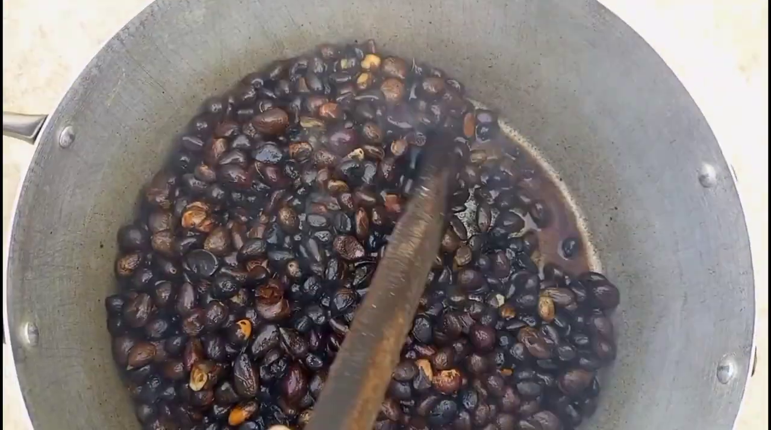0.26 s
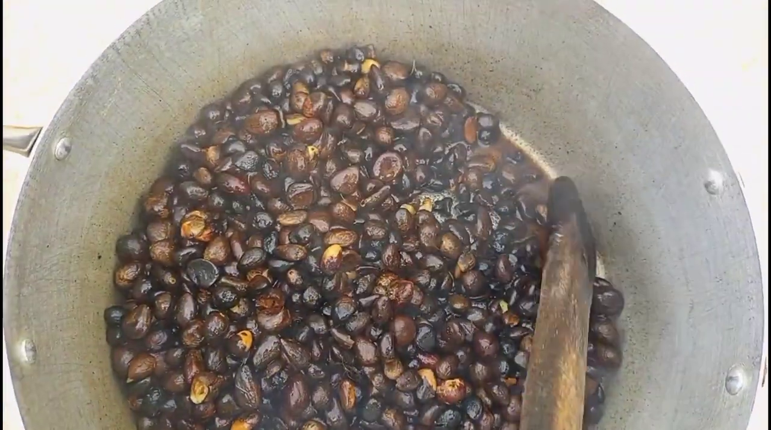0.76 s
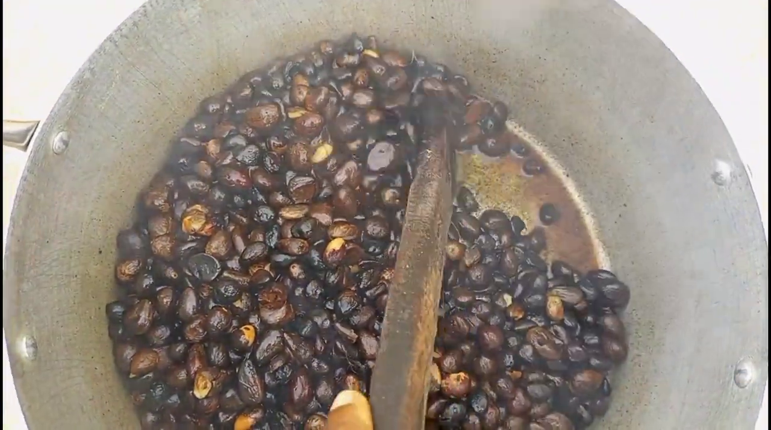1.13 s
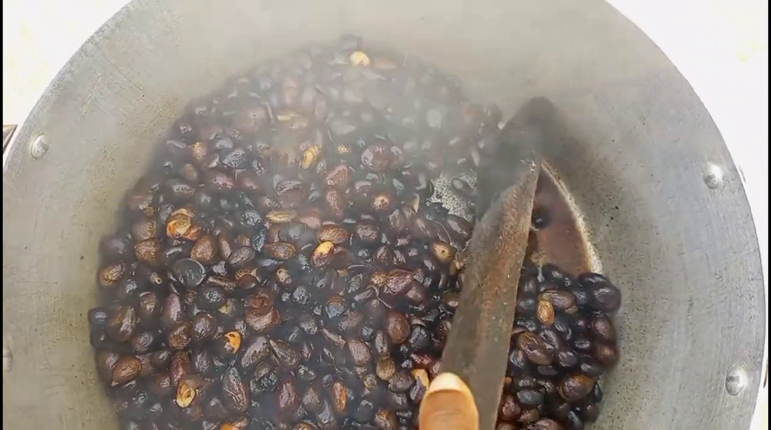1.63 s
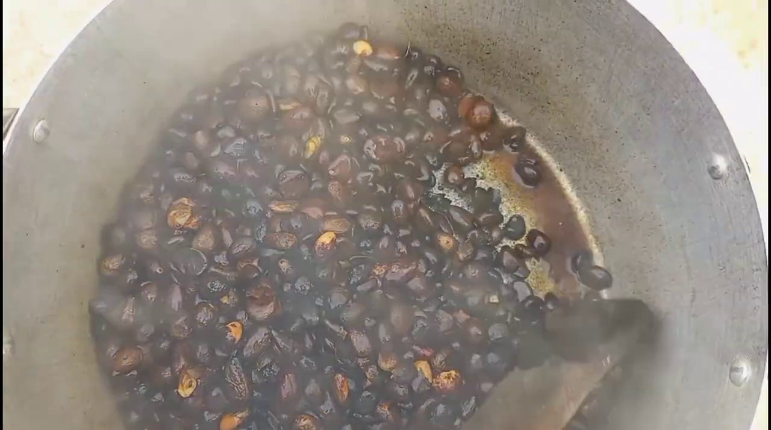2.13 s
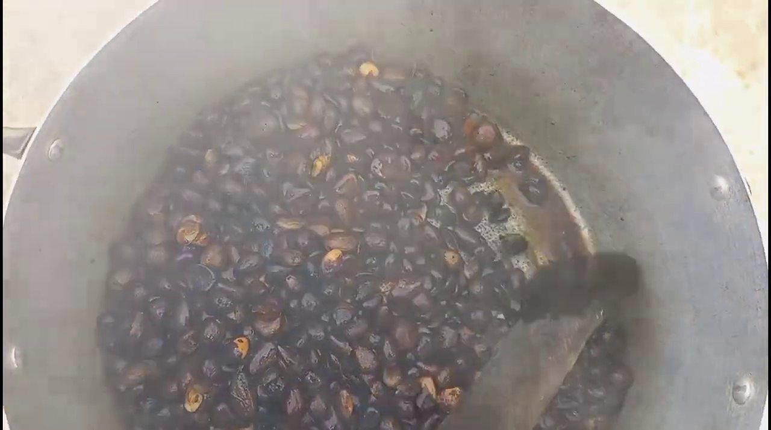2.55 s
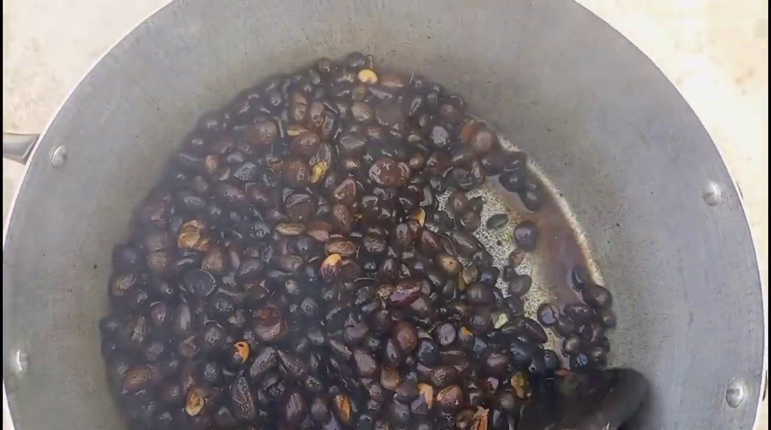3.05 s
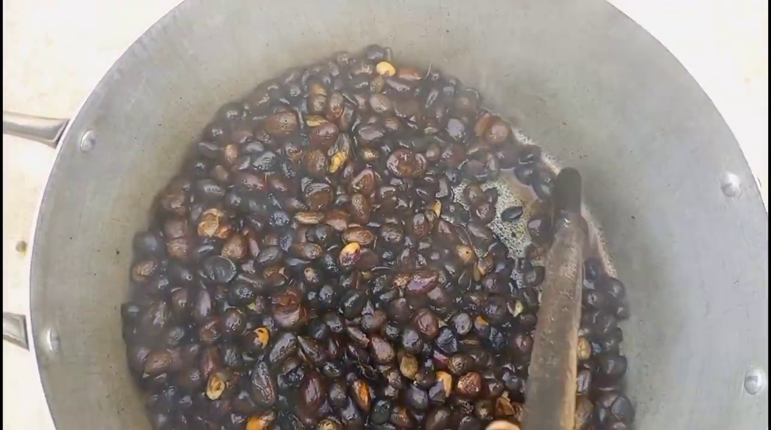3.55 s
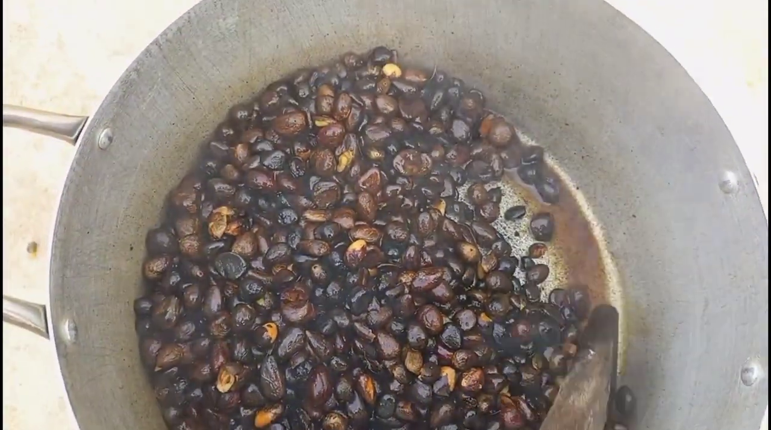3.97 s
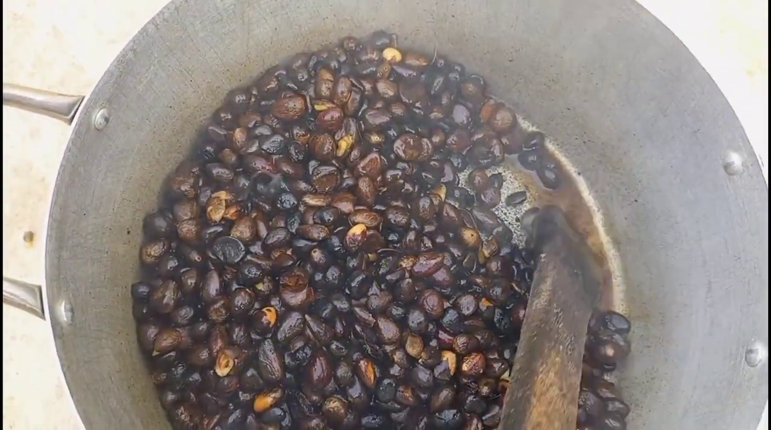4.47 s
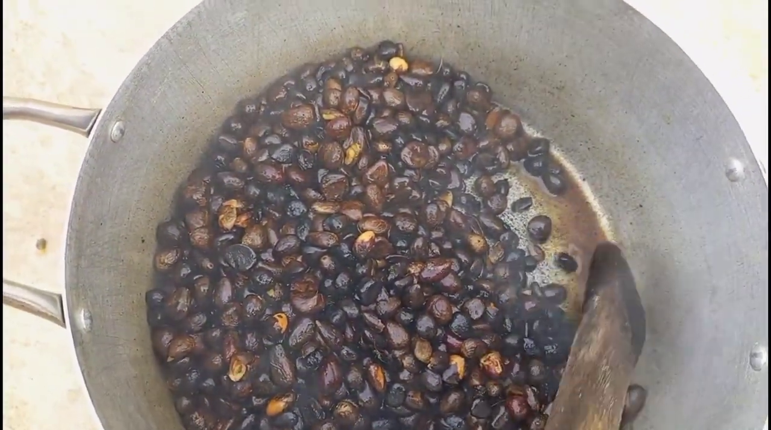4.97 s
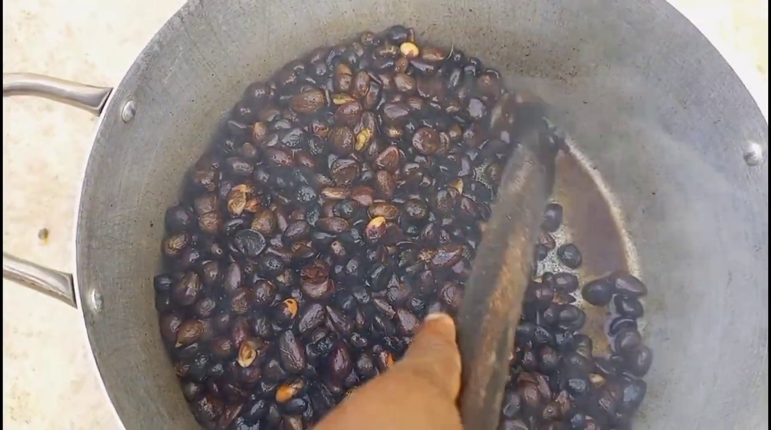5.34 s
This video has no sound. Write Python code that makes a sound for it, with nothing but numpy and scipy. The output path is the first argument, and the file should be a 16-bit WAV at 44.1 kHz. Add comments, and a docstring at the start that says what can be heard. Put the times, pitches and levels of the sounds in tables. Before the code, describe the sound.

Close, dry outdoor sound inside a metal pot. At 0 s there is only very faint fine sizzle, quiet air and a thin wavering whistle around 1.1 kHz, gone by 0.3 s. At 0.27 s quick dull knocks start a rattling shove and a brief sizzle flare; a weaker stroke follows at 0.5. A hard hollow knock at 1.0 brings rumble and clattering kernels, then a low pot shudder near 1.25 and a loud woody snap at 1.4. Dense clacks run 1.5-1.9, leading to a strong shove and sharp crack at 1.95. A heavy thud lands at 2.6, with kernels rattling and wall scrapes until 3. After a lull with small snaps, heavy knocks at 3.55 and 3.64 lead into bright scraping and clinks until 4.25. A knock at 4.48, soft rattling from 4.6 and a crisp snap at 4.95 follow; quiet, then a final rattling push at 5.5.

```python
"""A faint, fine sizzle opens the scene under a thin whistle that soon fades; loose kernels shift in a metal pot.
Hot shells snap now and then, as noise bursts with a woody body and a sharp top. A spatula shoves the heap of
kernels, which rumbles, rattles and settles: grains of short ringing kernels follow the level of each stroke.
The blade knocks, scrapes, groans and clinks on the pot, and hard kernels clack: struck modes, filtered clicks
and a sagging tone. The pot also shudders dully once; short echoes between its walls enclose most layers."""
import sys
import numpy as np
from scipy import signal
from scipy.fft import rfft, irfft, next_fast_len
from scipy.io import wavfile
from scipy.ndimage import uniform_filter1d

SR = 44100
rng = np.random.default_rng(int(sys.argv[2]) if len(sys.argv) > 2 else 0)


def dump_mix(stems):
    """Bounce the given channels to the path in sys.argv[1] as a 16-bit WAV at rate SR."""
    frames = np.atleast_2d(stems).T  # one column per channel
    limited = np.clip(frames, -1, 1)  # hard clip at full scale
    pcm = np.round(limited * 32767).astype(np.int16)
    wavfile.write(sys.argv[1], SR, pcm)


N = 246959
TIME = np.arange(N) / SR
HIT = np.arange(SR // 6) / SR   # the time axis of one short sound, in seconds


def from_db(db):
    """Decibels to gain."""
    return 10 ** (np.asarray(db) / 20)


def rms_one(x):
    """Scale to unit power."""
    return x / np.sqrt(np.mean(x ** 2) + 1e-20)


def peak_one(x):
    """Scale to unit height."""
    return x / (np.abs(x).max() + 1e-20)


def strike(x):
    """Scale a click to unit power over its first 6 ms."""
    return x / np.sqrt(np.mean(x[:round(.006 * SR)] ** 2) + 1e-20)


def in_time(rows):
    """The columns of a table, joined by straight lines."""
    s, *columns = np.transpose(rows)
    return [np.interp(TIME, s, c) for c in columns]


def drift(per_s):
    """Slow random wandering with a spread of about one, turning on average per_s times a second."""
    turns = np.cumsum(rng.exponential(1 / per_s, 1024))
    return np.interp(TIME, turns, rng.standard_normal(len(turns)))


def add(out, s, sound):
    """Mix a sound in at a time."""
    start = max(round(s * SR), 0)
    out[start:start + len(sound)] += sound[:max(N - start, 0)]


def band(x, low_hz, high_hz):
    """Butterworth band-pass."""
    return signal.sosfilt(signal.butter(2, [low_hz, high_hz], "band", fs=SR, output="sos"), x + 1e-18)


def dulled(x, edge_hz=7200):
    """Wet kernels and a blunt blade give little top."""
    return signal.sosfilt(signal.butter(4, edge_hz, fs=SR, output="sos"), x + 1e-18)


def resonance(x, hz, width_hz):
    """One ringing mode."""
    r = np.exp(-np.pi * width_hz / SR)
    return signal.lfilter([1, 0, -1], [1, -2 * r * np.cos(2 * np.pi * hz / SR), r * r], x + 1e-18)


def coloured(x, spectrum):
    """Causal (minimum-phase) filter with the given spectrum."""
    size = 2 * next_fast_len(len(x) // 2 + 2048)
    hz, db = np.transpose(spectrum)
    grid = np.log(np.arange(size // 2 + 1) * SR / size + 1)
    log_gain = np.log(from_db(np.interp(grid, np.log(hz), db)))
    # folding the cepstrum onto positive times makes the filter minimum-phase
    cepstrum = irfft(log_gain)
    cepstrum[1:size // 2] *= 2
    cepstrum[size // 2 + 1:] = 0
    return irfft(rfft(x, size) * np.exp(rfft(cepstrum)))[:len(x)]


def burst(t60):
    """A dying puff of noise."""
    return rng.standard_normal(len(HIT)) * from_db(-60 * HIT / t60)


def chime(hz, t60):
    """Modes struck together, each starting at a chance point of its cycle."""
    hz = np.reshape(hz, (-1, 1))
    return np.sin(2 * np.pi * (hz * HIT + rng.random(hz.shape))) * from_db(-60 * HIT / t60)


def contacts(per_s, spread_db):
    """Random touches, mostly light and a few hard."""
    return (rng.random(N) < per_s / SR) * from_db(spread_db * np.minimum(rng.exponential(1, N), 3))


def evened(sound, even_s):
    """The steady push of the hand evens out the power."""
    power = np.abs(uniform_filter1d(sound ** 2, int(even_s * SR) + 1))
    return sound / np.sqrt(power + 0.011 * power.mean())


def bowl(x, wet_db=-15, t60=0.08):
    """Sound bounces briefly between the metal walls: a short tail of coloured noise."""
    colour = [(100, -2.0), (1500, -6.5), (3300, -10), (7000, -2.0), (15000, -21.0)]
    echoes = coloured(burst(t60) * (1 - np.exp(-HIT / 0.0015)), colour)
    echoes /= np.sqrt(2 * np.sum(echoes ** 2))
    return x + from_db(wet_db) * signal.oaconvolve(x, echoes)[:N]


# Colour of the air bed. Each row: frequency in Hz, relative level in dB.
AIR_COLOUR = [(30, -25), (300, 1), (1000, -7.5), (1800, -3.5), (4400, -21), (16000, -24.5)]
# Colour of the bursting bubbles. Each row: frequency in Hz, relative level in dB.
FIZZ_COLOUR = [(900, -26), (2100, -1.5), (4500, -19), (6300, -5), (7800, -10.5), (9800, -4.5), (12000, -18),
               (15000, -13)]
# The sizzle flares as the first stroke turns wet kernels onto hot metal. Each row: time in seconds, level in dB.
FIZZ_LEVEL = [(.25, -71.5), (.29, -57), (.6, -67), (1.6, -68.5)]


def sizzle(air_db=-78, crackle_db=-76):
    """Countless tiny bubbles and a few larger ones burst in the hot liquid, over still outdoor air."""
    fizz = rms_one(coloured(rng.standard_normal(N), FIZZ_COLOUR))
    bubbles = signal.oaconvolve(contacts(per_s=72.0, spread_db=7.5), burst(0.0058))[:N]
    crackle = rms_one(coloured(bubbles, FIZZ_COLOUR))
    air = rms_one(coloured(rng.standard_normal(N), AIR_COLOUR))
    fizz_db, = in_time(FIZZ_LEVEL)
    return from_db(fizz_db) * fizz + from_db(crackle_db) * crackle + from_db(air_db) * air


# A faint whistle. Each row: time in seconds, centre pitch in Hz, level in dB.
WHISTLE_PATH = [(0, 1060, -71.5), (.13, 1140, -69), (.33, 1115, -94.5)]


def whistle(waver_hz=14):
    """A thin, slightly unsteady tone that rises and fades."""
    hz, db = in_time(WHISTLE_PATH)
    hz = hz + waver_hz * rms_one(band(rng.standard_normal(N), 15, 120))
    return from_db(db) * np.sqrt(2) * np.sin(2 * np.pi * np.cumsum(hz) / SR)


def push(s, rise_s, hold_s, t60):
    """A stroke of the hand builds up, holds and dies away."""
    age = TIME - s
    rise = np.clip(age / rise_s, 0, 1)
    return rise * from_db(-60 * np.clip((age - rise_s - hold_s) / t60, 0, 2))


# The blade shoves the heap, which then settles. Each row: start in seconds, rise in seconds, hold in seconds,
# t60 of the fading effort in seconds, rumble level in dB, kernel rattle level in dB.
SHOVES = [(0.266, 0.0015, .21, 0.25, -44, -46.5), (0.503, 0.027, 0.2, 0.28, -59, -63.5),
          (0.9, 0.0028, 0.079, 0.18, -57.5, -57.5), (0.985, 0.012, 0.11, 0.29, -39, -44),
          (1.19, 0.086, 0.015, 0.9, -48.5, -49.5), (1.504, 0.039, 0.11, 0.038, -51.5, -61.5),
          (1.671, 0.002, 0.0041, 0.89, -43, -49), (1.949, 0.0061, 0.0097, 0.26, -33.5, -36.5),
          (2.014, 0.051, 0.096, 0.46, -52.5, -50), (2.447, 0.07, 0.021, 0.054, -59, -54.5),
          (2.605, 0.011, 0.16, 0.57, -42, -50.5), (2.706, 0.0305, 0.063, 0.62, -76.5, -45),
          (2.867, 0.037, 0.0094, 0.16, -45, -47.5), (3.699, 0.081, 0.0042, 0.049, -60, -48),
          (4.622, 0.12, 0.014, 0.39, -45, -45), (4.97, 0.0084, 0.0067, 0.09, -81, -44.5),
          (5.489, 0.0046, 0.044, 0.21, -43.5, -42)]
# The blade's edge slides on the wall. Each row: start in seconds, hold in seconds, level in dB.
SCRAPES = [(0.364, 0.13, -57.5), (0.962, 0.2, -63.5), (2.153, 0.027, -53.5), (2.703, 0.11, -49.5),
           (2.868, 0.16, -57), (3.762, 0.011, -44), (3.852, 0.15, -51), (4.15, 0.048, -59.5),
           (4.68, 0.17, -58)]
SCRAPE_RISE_S, SCRAPE_T60_S = 0.0014, 0.17   # the edge bites at once, and the wall rings on after it lifts
DRAG_DB = -12.5   # every shove also drags the blade over the bottom, this far below the rattle
LOOSE_DB = -75    # loose kernels keep shifting between the shoves
NUDGE_DB = -16    # a scrape nudges a few kernels, this far below its own level


def strokes(rumble_power=1.11, rattle_power=0.78):
    """Rumble, rattle and scrape in dB: strokes add in power, and the heap stops before its loose kernels do."""
    rumble, rattle, scrape = np.full((3, N), 1e-12)
    for s, rise_s, hold_s, t60, rumble_db, rattle_db in SHOVES:
        effort = push(s, rise_s, hold_s, t60)
        rumble += (from_db(rumble_db) * effort ** rumble_power) ** 2
        rattle += (from_db(rattle_db) * effort ** rattle_power) ** 2
    for s, hold_s, db in SCRAPES:
        scrape += (from_db(db) * push(s, SCRAPE_RISE_S, hold_s, SCRAPE_T60_S)) ** 2
    nudged = from_db(LOOSE_DB) ** 2 + from_db(NUDGE_DB) ** 2 * scrape
    dragged = from_db(DRAG_DB) ** 2 * rattle
    return 10 * np.log10([rumble, rattle + nudged, scrape + dragged])


def grains(touches, spectrum, t60, even_s, low_hz, high_hz, tone_db, count=32):
    """Each touch rings one of several kernels, each with its own note; the same few stay in contact for a while."""
    rings = np.zeros(N)
    kernels = []
    for note in chime(rng.permutation(np.geomspace(low_hz, high_hz, count)), t60):
        tap = coloured(7 * (HIT == 0) + burst(t60), spectrum)
        kernels.append((strike(tap) + from_db(tone_db) * strike(note))[:SR // 30])
    at = np.flatnonzero(touches)
    # two neighbouring kernels share the touches, moving on 22 times a second
    dealt = (TIME[at] * 22 + rng.integers(0, 2, len(at))).astype(int) % count
    for i, k in zip(at, dealt):
        add(rings, i / SR, touches[i] * (-1) ** k * kernels[k])
    return evened(dulled(rings), even_s)


# Modes of the bare wall, rung by the blade's edge. Each row: frequency in Hz, relative level in dB.
WALL_MODES = [(2050, 5), (2320, 8), (3080, 2.5), (3220, 3), (3420, 3.5), (4340, -15), (5300, 0.5),
              (5950, 0), (6300, -18.5)]


def singing(touches, width_hz=45, wander_db=4, weak_db=-6):
    """Slips drive the wall's main modes and many weak ones, now one and now another as the blade travels."""
    weak = [(hz, weak_db) for hz in rng.uniform(1700, 6800, 10)]
    modes = np.zeros(N)
    for hz, db in WALL_MODES + weak:
        level = from_db(db + wander_db * drift(30))
        modes += level * rms_one(resonance(touches * rng.standard_normal(N), hz, width_hz))
    return evened(dulled(band(modes, 1700, 11000)), even_s=0.061)


# Colour of the shoved heap. Each row: frequency in Hz, relative level in dB.
RUMBLE_COLOUR = [(50, -46.5), (125, -22), (190, -8.5), (300, -5), (410, 5), (640, -3.5), (900, -2),
                 (1400, -41.5)]
# Colour of the rattling kernels. Each row: frequency in Hz, relative level in dB.
RATTLE_COLOUR = [(400, -26), (850, 5.5), (1200, -4.5), (1650, 9.5), (2300, 4.5), (2900, -6.5),
                 (4500, -20.5), (9000, -28.5)]
# Colour of the grating blade. Each row: frequency in Hz, relative level in dB.
SCRAPE_COLOUR = [(1500, -13), (2200, -2.5), (3400, 1.5), (4400, -6), (5500, 2), (6800, -2.5), (7800, -25.5)]


def stirring(grate_db=-5.0, sing_db=2.5):
    """The shoved heap rumbles, its kernels rattle, and the blade's edge sticks and slips on the metal."""
    rumble_db, rattle_db, scrape_db = strokes()
    bumps = contacts(per_s=110, spread_db=5.5)   # shared, so that all three layers jolt together
    slips = bumps + contacts(per_s=900, spread_db=3.5)
    rumble = grains(bumps + contacts(per_s=200, spread_db=2.0), RUMBLE_COLOUR,
                    t60=0.024, even_s=0.026, low_hz=300, high_hz=605, tone_db=-13.5)
    rattle = grains(bumps + contacts(per_s=150, spread_db=5.5), RATTLE_COLOUR,
                    t60=0.034, even_s=0.023, low_hz=1314, high_hz=2650, tone_db=-2.5)
    grate = grains(slips, SCRAPE_COLOUR, t60=0.012, even_s=0.19, low_hz=2500, high_hz=6570, tone_db=-16)
    bare = np.sqrt(1 / (1 + from_db(rumble_db - scrape_db)))   # kernels heaped on the wall damp its ring
    scrape = from_db(grate_db) * (2 - bare) * grate + from_db(sing_db) * bare * singing(slips)
    return from_db(rumble_db) * rumble + from_db(rattle_db) * rattle + from_db(scrape_db) * scrape


# Hot shells snap. Each row: start in seconds, level of the crack's body in dB, level of its sharp top in dB.
SNAPS = [(0.133, -45, -50), (0.447, -51, -45.5), (0.8143, -43, -39), (1.187, -42, -68), (1.394, -21, -33.5),
         (1.6727, -49.5, -46), (1.9409, -32.5, -27.5), (3.0698, -48.5, -46.5), (3.1384, -52.5, -56.5),
         (3.367, -52.5, -56), (3.5469, -44, -39), (3.7684, -36.5, -61), (3.7922, -35, -60),
         (3.8472, -38.5, -44.5), (4.4415, -37.5, -38), (4.954, -36, -27.5), (5.539, -42, -37)]
# Colour of the crack's woody body. Each row: frequency in Hz, relative level in dB.
SHELL_BODY = [(200, -32), (1000, -18.5), (2400, 0), (3600, 0.5), (4700, -8.5), (6300, 6.5), (8000, -17.5)]
# Colour of the crack's sharp top. Each row: frequency in Hz, relative level in dB.
SHELL_TOP = [(3000, -38.5), (7700, -5), (8900, 9.5), (10300, 3), (12000, -8), (14500, -1.5)]


def snaps(t60=0.0105, top_t60=0.006):
    """A shell splits within about a millisecond: two short noise bursts, one woody and one sharp."""
    out = np.zeros(N)
    split = 1 - np.exp(-HIT / 0.00072)
    for s, body_db, top_db in SNAPS:
        add(out, s, from_db(body_db) * strike(coloured(split * burst(t60), SHELL_BODY)))
        add(out, s, from_db(top_db) * strike(coloured(split * burst(top_t60), SHELL_TOP)))
    return out


# The blade knocks on the pot. Each row: start in seconds, thud level in dB, thud pitch in Hz,
# level of its ring in dB relative to the thud, clack level in dB.
KNOCKS = [(0.2721, -29, 398, -12, -33.5), (0.2828, -22, 453, -26, -29.5), (0.324, -34, 375, -11, -49),
          (0.345, -28.5, 410, -19, -63), (0.392, -29, 404, -18, -34.5), (0.905, -33, 266, -9, -41.5),
          (0.9986, -15.5, 448, -5, -22), (1.761, -29, 315, -9, -29.5), (1.956, -24, 399, -8, -33),
          (1.975, -25.5, 387, -3.5, -41.5), (2.588, -12.5, 349, -27, -22), (2.6152, -23.5, 449, -10, -27.5),
          (3.5554, -18.5, 367, -15.5, -27.5), (3.636, -12.5, 421, -5, -22.5),
          (4.483, -20, 316.4, -11.5, -22.5), (5.534, -29, 447, -8, -33)]
# Modes of the loaded pot. Each row: frequency in Hz, relative level in dB, t60 in seconds.
POT_MODES = [(237.8, 0.5, 0.16), (320, -2, 0.06), (497, 0.5, 0.05), (900, -1, 0.091), (1680, -8, 0.11),
             (2250, -21.5, 0.12)]
BLADE_HZ = 1740   # the blade's own woody note


def knocks(thud_width=1.535, body_width_hz=42, clack_t60=0.023, overtone=2.93, pot_db=-25, blade_db=-3, crack_db=-5):
    """The cushioned blade thuds and rings on at that pitch, wakes the pot's modes, and clacks on two woody notes."""
    out = np.zeros(N)
    hz, mode_db, t60 = np.transpose(POT_MODES)[:, :, None]
    swell = 1 - np.exp(-HIT / 0.00047)
    for s, thud_db, thud_hz, ring_db, clack_db in KNOCKS:
        thud = band(HIT == 0, thud_hz / thud_width, thud_hz * thud_width)
        thud = peak_one(band(thud, 96, 600))
        body = thud + from_db(ring_db) * peak_one(resonance(thud, thud_hz, body_width_hz))
        pot = swell * np.sum(from_db(mode_db) * chime(hz, t60), axis=0)
        contact, blade = swell * chime([overtone * thud_hz, BLADE_HZ], clack_t60)
        crack = peak_one(band(swell * burst(0.034), 840, 2800))
        clack = peak_one(contact + from_db(blade_db) * blade) + from_db(crack_db) * crack
        add(out, s, from_db(thud_db) * (body + from_db(pot_db) * pot) + from_db(clack_db) * clack)
    return out


# The hardest clacks of single kernels against the blade and the wall.
# Each row: start in seconds, nominal peak level in dB before colouring, pitch in Hz.
CLACKS = [(0.447, -22, 2080), (0.481, -26.5, 870), (0.709, -31.5, 900), (0.769, -35, 850),
          (0.904, -28.5, 2650), (0.976, -18, 2800), (0.985, -25, 1670), (1.069, -28, 3470),
          (1.093, -22.5, 1590), (1.13, -27.5, 2960), (1.23, -26.5, 1620), (1.49, -28, 880),
          (1.5463, -28, 1190), (1.581, -27.5, 1020), (1.598, -22, 2310), (1.614, -23, 1830),
          (1.639, -30, 1380), (1.6742, -34, 1370), (1.7101, -20.5, 1440), (1.729, -32, 1150),
          (1.743, -20, 1530), (1.757, -25, 1750), (1.8576, -25.5, 1250), (2.037, -31, 1480),
          (2.16, -30, 2250), (2.403, -38.5, 1204), (2.482, -32.5, 1520), (2.511, -25.5, 1650),
          (2.631, -22, 770), (2.792, -38, 1765), (2.902, -25, 1630), (2.916, -22.5, 1990),
          (2.94, -27, 1780), (3.779, -27.5, 900), (3.864, -24.5, 3920), (4.717, -30, 2080),
          (4.845, -30, 1970), (4.985, -36.5, 2130), (5.494, -28.5, 900), (5.512, -23.5, 2260)]
CREST_DB = 12   # a clack's nominal peak stands this far above its power


def clacks(width=1.57, shiver_db=-20, t60=0.041, tail_db=-46, tail_t60=0.34, contact_s=.001,
           note_db=-4, note_t60=0.016, overtone=1.7, overtone_db=-4):
    """A hard kernel hits with a short, shivering pulse and rings at its own pitch and one overtone."""
    out = np.zeros(N)
    for s, db, hz in CLACKS:
        touch = (HIT == 0) + from_db(shiver_db) * burst(t60) + from_db(tail_db) * burst(tail_t60)
        pulse = strike(band(touch, hz / width, hz * width))
        low, high = chime([hz, hz * overtone], note_t60)
        note = strike(low + from_db(overtone_db) * high)
        add(out, s + contact_s, from_db(db - CREST_DB) * strike(pulse + from_db(note_db) * note))
    return coloured(out, [(150, 0.0), (3500, -3), (4400, -8.0), (6500, 3.5), (8000, -18.0)])


# The dragging blade makes the bottom groan.
# Each row: start in seconds, relative level in dB, starting pitch in Hz, seconds it takes to fade by fade_db.
GROANS = [(0.914, -51, 321, 0.19), (3.77, -45.5, 244, 0.046), (4.427, -52, 900, 0.024),
          (5.36, -55.5, 729, 0.037)]


def groans(sag_octaves_per_s=2.2, rough=0.85, fade_db=16, rise_s=0.0054):
    """A rough tone swells, then sags in pitch and fades as the blade slows."""
    out = np.zeros(N)
    for s, db, hz, fade_s in GROANS:
        phase = 2 * np.pi * np.cumsum(hz * 2 ** (-sag_octaves_per_s * HIT)) / SR
        grip = 1 + rough * rms_one(band(rng.standard_normal(len(HIT)), 16, 90))
        level = from_db(db - fade_db * HIT / fade_s) * (1 - np.exp(-HIT / rise_s))
        add(out, s, level * grip * 2 * np.sin(phase))
    return out


# The pot rocks dully on its stand. Each row: time in seconds, relative level in dB, centre pitch in Hz.
ROCKING_PATH = [(1.22, -92.5, 94), (1.25, -58.5, 92.6), (1.5, -69.5, 65), (1.58, -93.5, 65)]


def rocking(rough_db=-3):
    """A dull, uneven shudder of the whole pot, wandering in pitch."""
    db, hz = in_time(ROCKING_PATH)
    phase = 2 * np.pi * np.cumsum(hz * (1 + 0.19 * drift(60))) / SR
    shudder = np.sin(phase) * (1 + .4 * drift(40))
    rough = rms_one(band(rng.standard_normal(N), 85, 140))
    return from_db(db) * (shudder + from_db(rough_db) * rough)


# The blade's edge clinks on the bare wall.
# Each row: start in seconds, level in dB before dulling, lower partial in Hz, upper partial in Hz.
CLINKS = [(2.225, -47, 2190, 3380), (2.673, -41.5, 1510, 1585), (2.821, -37, 2340, 3370),
          (2.997, -42.5, 3490, 4600), (3.419, -58, 1505, 3080), (3.432, -54, 1580, 3100),
          (3.447, -56.5, 3070, 5200), (3.738, -47, 3610, 5220), (3.766, -37.5, 2028, 2270),
          (3.864, -45, 3280, 6170), (3.91, -38, 3375, 6260), (3.993, -41.5, 3330, 5910),
          (4.144, -47, 3360, 5630), (4.197, -47.5, 3120, 3600), (4.246, -59, 3040, 3230),
          (4.4, -43, 2340, 3140), (5.3453, -43, 1540, 2090)]


def clinks(t60=0.085, upper_db=-2, wall_db=-6, focus_db_per_octave=12, grit_db=-5, grit_t60=0.04, rise_s=.0005):
    """The edge skips on the bare wall: a little grit, two strong partials, and wall modes, favouring those near."""
    out = np.zeros(N)
    hz, mode_db = np.transpose(WALL_MODES)
    for s, db, low_hz, high_hz in CLINKS:
        low, high = chime([low_hz, high_hz], t60)
        partials = strike(low + from_db(upper_db) * high)
        octaves_off = np.abs(np.log2(hz / np.sqrt(low_hz * high_hz)))
        wall = from_db(mode_db - focus_db_per_octave * octaves_off) @ chime(hz, t60)
        grit = band(burst(grit_t60), low_hz / 0.94, high_hz * 1.4)
        sound = partials + from_db(wall_db) * strike(wall) + from_db(grit_db) * strike(grit)
        add(out, s, from_db(db) * strike(sound * (1 - np.exp(-HIT / rise_s))))
    return dulled(out)


def scene():
    """Heap and blade echo inside the pot; shells snap on top of the heap, further from the walls, and echo less."""
    shells = bowl(snaps(), wet_db=-21)
    blade = bowl(knocks(), wet_db=-15.5)
    heap = bowl(stirring() + groans() + clacks() + clinks())
    return (heap + blade + shells + rocking() + sizzle() + whistle())[None]


def record(dry, cutoff_hz=15900):
    """The top is cut steeply."""
    return signal.sosfilt(signal.ellip(10, .2, 70, cutoff_hz, fs=SR, output="sos"), dry)


dry = scene()
out = record(dry)
dump_mix(out)
```